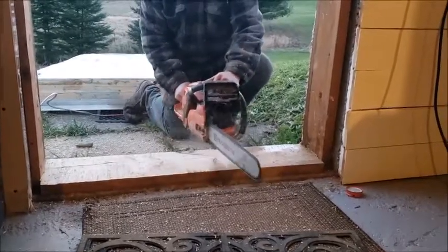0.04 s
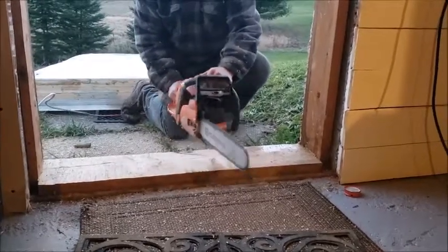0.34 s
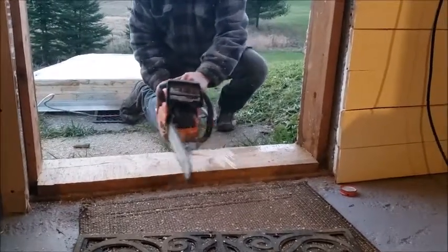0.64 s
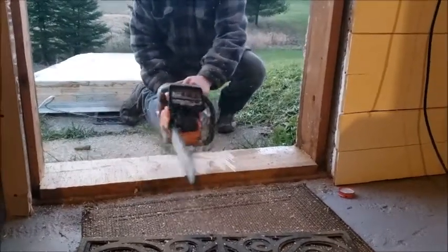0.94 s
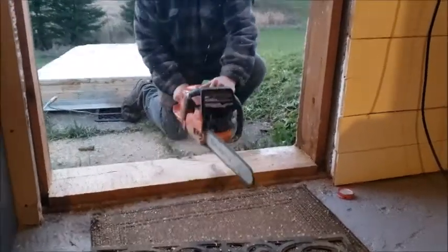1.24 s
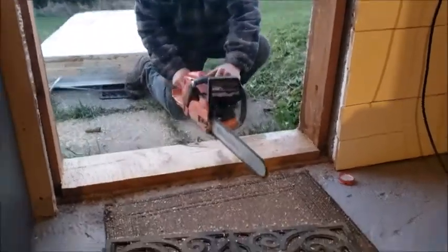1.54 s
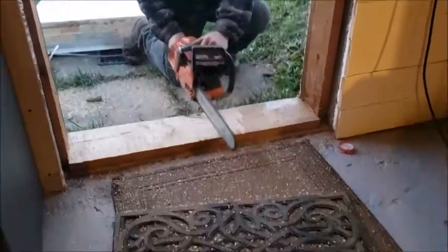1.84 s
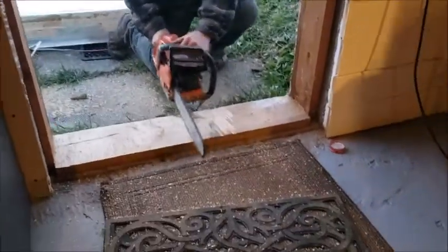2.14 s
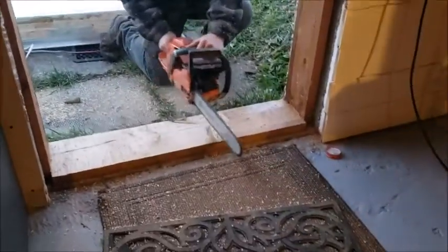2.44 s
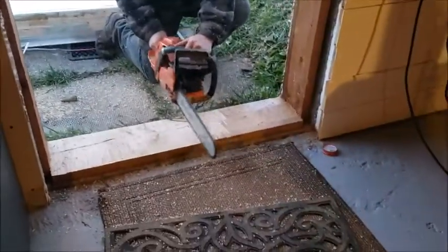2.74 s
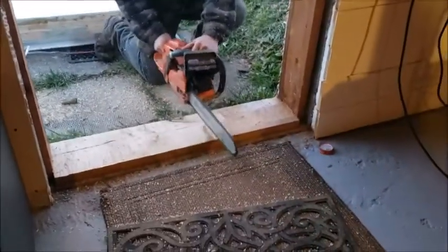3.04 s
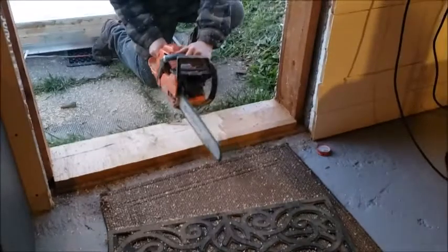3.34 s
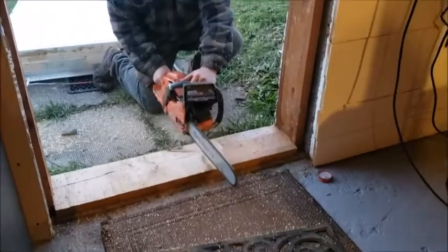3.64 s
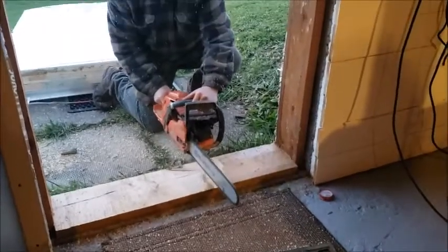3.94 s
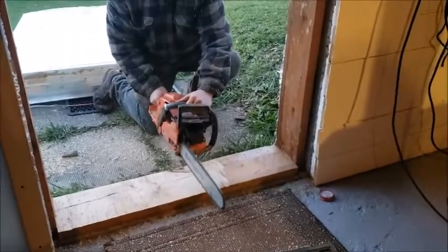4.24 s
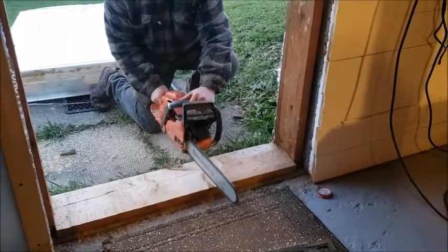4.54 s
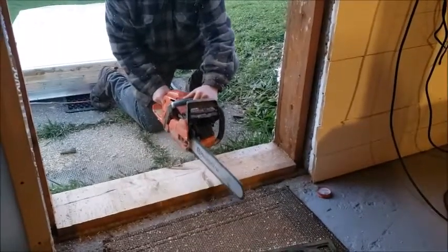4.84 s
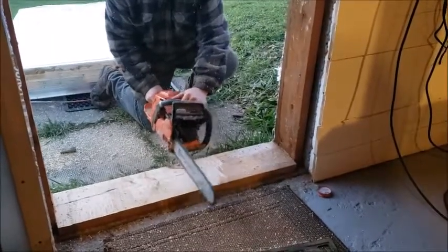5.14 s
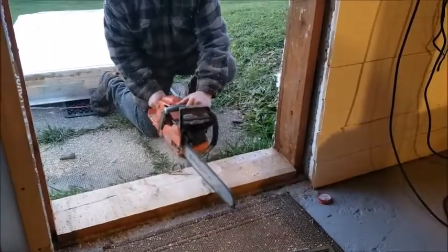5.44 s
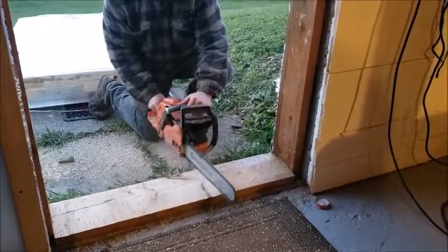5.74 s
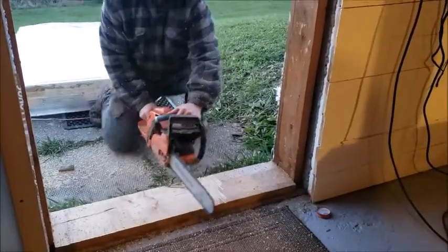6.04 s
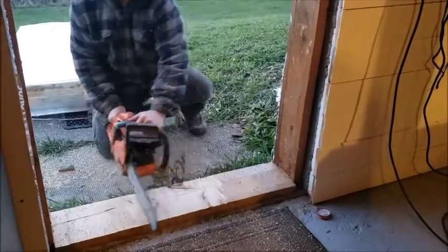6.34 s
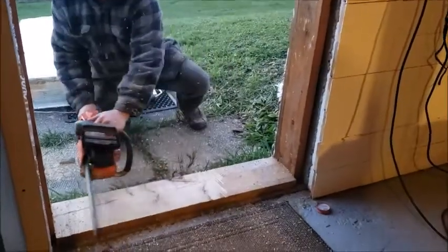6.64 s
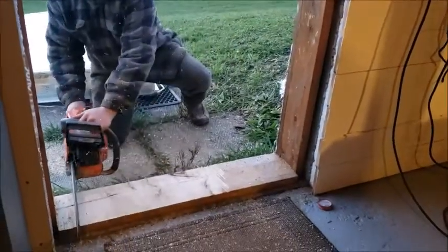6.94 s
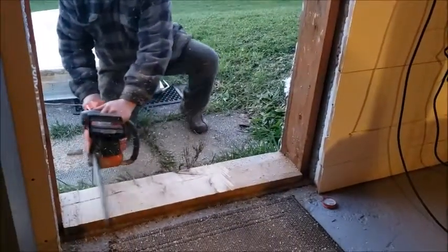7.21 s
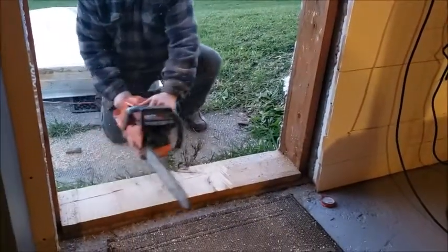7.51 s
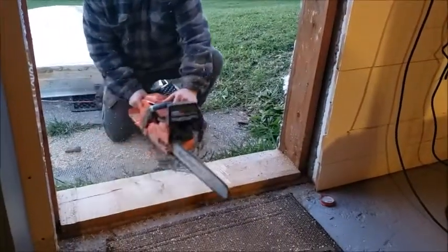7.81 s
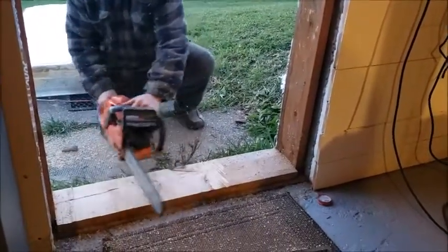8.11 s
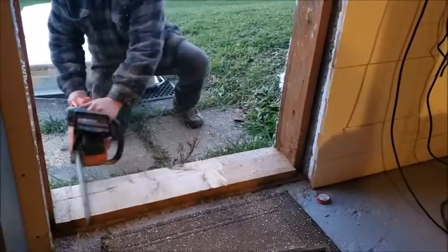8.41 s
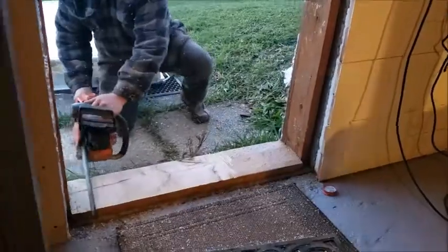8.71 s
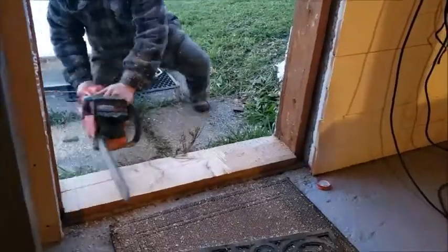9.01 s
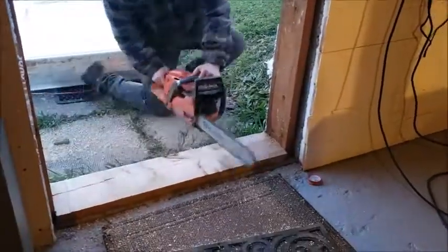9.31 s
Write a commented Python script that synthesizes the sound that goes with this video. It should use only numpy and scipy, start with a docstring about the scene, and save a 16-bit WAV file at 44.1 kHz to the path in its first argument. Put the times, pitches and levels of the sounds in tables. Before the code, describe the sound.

A two-stroke chainsaw buzzes at high revs while trimming wood, sagging briefly with each bite over a rasping chain.

```python
"""A two-stroke chainsaw, already at full throttle, trims a wooden door sill; a stereo microphone
stands just inside the doorway. Running light, the engine fires only every third or fourth turn; when
the chain bites, the speed sags and it fires every turn. Over the exhaust lie the whine of the flywheel
fan, the ring of the bar and the rasp of the chain. After nearly nine seconds the sound stops dead."""
import sys
import numpy as np
from scipy import signal
from scipy.fft import rfft, irfft, next_fast_len
from scipy.io import wavfile
from scipy.ndimage import uniform_filter1d

SR = 44100
rng = np.random.default_rng(int(sys.argv[2]) if len(sys.argv) > 2 else 0)


def unload_wav(signal):
    """Save mono or channel-first audio to the path in sys.argv[1] as 16-bit WAV at rate SR, clipped to [-1, 1]."""
    wavfile.write(
        sys.argv[1],
        SR,
        np.round(np.clip(np.atleast_2d(signal).T, -1, 1) * 32767).astype(np.int16),
    )


N = 422018
TIME = np.arange(N) / SR
CRUISE_HZ, TREBLE_EDGE_HZ = 200, 15780

# crankshaft speed, sagging each time the chain bites: (time [s], speed [turns/s])
CRANK_SPEED = [(0.0, 199.8), (0.23, 183.6), (0.36, 199.1), (0.77, 197.5), (0.86, 200.2), (0.95, 194.3),
               (1.1, 193.0), (1.25, 199.3), (1.45, 194.5), (1.52, 183.2), (1.61, 183.3), (1.68, 199.5),
               (1.8, 200.1), (1.9, 186.2), (2.24, 205.2), (2.58, 202.1), (2.7, 195.4), (3.03, 203.7),
               (3.41, 197.2), (3.47, 201.3), (3.74, 202.0), (3.89, 192.5), (4.15, 203.3), (4.34, 197.8),
               (4.6, 200.5), (4.75, 197.3), (4.91, 205.1), (5.22, 197.3), (5.51, 199.4), (5.64, 186.8),
               (5.87, 204.1), (5.96, 201.2), (6.1, 184.6), (6.26, 207.2), (6.42, 211.2), (6.77, 202.8),
               (6.99, 188.6), (7.19, 204.1), (7.51, 209.7), (7.63, 204.1), (7.75, 207.7), (7.88, 197.1),
               (8.21, 201.4), (8.34, 208.4), (8.54, 204.7), (8.65, 198.1)]
# burble of the bangs and the second harmonic: (time [s], relative level [dB])
BURBLE_LEVEL = [(0, 2), (1.4, 1.5), (2.4, -0.5), (3.4, -1.5), (5.2, -1.5), (5.7, -3.5), (6.5, -1.5),
                (8, -3), (8.64, -1.5)]


def gain_of(db):
    """Decibels to amplitude."""
    return 10 ** (np.asarray(db) / 20)


def unit_rms(x):
    """Scales to rms 1."""
    return x / np.sqrt(np.mean(x ** 2) + 1e-20)


def curve(rows):
    """A timed table's value at every sample."""
    return np.interp(TIME, *np.transpose(rows))


def value_at(spectrum, hz, column=1):
    """One column of a spectrum, interpolated on a log-frequency axis."""
    columns = np.transpose(spectrum)
    return np.interp(np.log(hz + 1), np.log(columns[0] + 1), columns[column])


def wander(rate_hz, channels=1, size=16384):
    """Slow random motion of rms 1."""
    hz = np.fft.rfftfreq(size, N / SR / size)
    white = rfft(rng.standard_normal((channels, size)))
    coarse = unit_rms(irfft(white / (1 + (hz / rate_hz) ** 2)))
    return np.array([np.interp(TIME, np.linspace(0, N / SR, size), row) for row in coarse])


def colour(x, spectrum, column=1, size=4096):
    """Minimum-phase filter with the given spectrum."""
    hz = abs(np.fft.fftfreq(size, 1 / SR))
    log_gain = np.log(gain_of(value_at(spectrum, hz, column)))
    response = np.fft.ifft(np.exp(np.conj(signal.hilbert(log_gain)))).real
    return signal.oaconvolve(x, response)[:N]


def pulses(at, height):
    """Impulses at fractional sample positions."""
    whole, part = np.divmod(np.clip(at, 0, N - 2), 1)
    whole = whole.astype(int)
    return np.bincount(whole, height * (1 - part), N) + np.bincount(whole + 1, height * part, N)


def decay(x, tail_s):
    """Gives each impulse an exponential tail."""
    return signal.lfilter([1], [1, -np.exp(-1 / (tail_s * SR))], x)


def tone(cycles, rough=0, rough_hz=1):
    """A sine of rms 1; roughness makes its height and phase waver, differently left and right."""
    shake = rough * (wander(rough_hz, channels=2) + 1j * wander(rough_hz, channels=2)) if rough else 0
    return unit_rms(((1 + shake) * np.exp(2j * np.pi * cycles)).imag)


def firings(openings, light_turns=3, stumble_chance=.01, back_to_back_db=-4.5):
    """Burn strength on each turn: the cylinder needs some turns to clear, now and then one more."""
    # spells away from the usual firing rhythm: (start [s], length [s], firing interval [turns])
    spells = [(.44, .29, 4), (1.46, .24, 1), (1.87, .32, 1), (3.52, .2, 4), (4.85, .19, 4), (5.58, .16, 1),
              (5.9, .18, 4), (6.08, .18, 1), (6.66, .26, 4), (6.92, .16, 1), (7.73, .19, 4), (7.92, .13, 1)]
    interval = np.full(len(openings), light_turns)
    for start, length, turns in spells:
        interval[(openings >= start * SR) & (openings < (start + length) * SR)] = round(turns)
    late = rng.random(len(openings)) < stumble_chance
    strength, waited = np.zeros(len(openings)), 0
    for turn in range(len(openings)):
        waited += 1
        if waited >= interval[turn] + late[turn]:
            strength[turn] = gain_of(back_to_back_db if waited == 1 else 0)
            waited = 0
    return strength


def exhaust(turns, openings, burns, buzz_db=-40, bang_db=-36, uneven_db=0.9, throb_db=0.9):
    """The port puffs every turn and the muffler hums, both louder under load; each burn adds a bang."""
    # one puff of the exhaust port: (frequency [Hz], relative level [dB])
    puff_spectrum = [(750, -29.5), (980, 11.5), (1200, 3), (1400, 3.5), (1600, 0.5), (1800, 5), (2000, 0.5),
                     (2200, -20), (2800, -10.5), (3400, -12), (4400, -5), (6000, -33)]
    # the bang of one burn: (frequency [Hz], relative level [dB])
    bang_spectrum = [(38, -23.5), (68, 5), (100, 2), (130, -2.5), (200, -6), (270, 5.5), (335, 1.5),
                     (400, -1), (480, 7), (660, -10), (1050, 0), (1400, -8), (1900, -19), (6000, -25)]
    # muffler hum at cruising speed, weakest with the saw swung aside: (time [s], relative level [dB])
    hum_level = [(0.0, -33), (1.32, -35), (2.16, -32), (2.28, -35.7), (2.52, -31), (3.96, -29),
                 (6.12, -29.5), (6.48, -26.5), (6.6, -34.5), (7.08, -33), (7.32, -36.2), (7.56, -30.5),
                 (8.04, -27.5), (8.52, -37.5), (8.64, -34)]
    puff_size, bang_size = gain_of(uneven_db * rng.standard_normal((len(openings), 2)).T)
    sag_hz = CRUISE_HZ - curve(CRANK_SPEED)
    buzz = unit_rms(colour(pulses(openings, puff_size), puff_spectrum))
    buzz *= gain_of(buzz_db + 0.15 * sag_hz)
    bangs = unit_rms(colour(pulses(openings, burns * bang_size), bang_spectrum))
    bangs *= gain_of(bang_db + curve(BURBLE_LEVEL))
    hum_db = curve(hum_level)
    hum = tone(turns) * gain_of(hum_db + 1 + 0.29 * sag_hz + throb_db * wander(rate_hz=5))
    overtones = muffler_overtones(turns, swell_db=hum_db - np.median(hum_db))
    buzz = hallway(buzz, wet_db=-0.5, t60_s=.1, low_hz=494, swing_hz=.7)
    bangs = hallway(bangs, wet_db=-3, t60_s=.15, low_hz=299.4, swing_hz=.5)
    return hum + overtones + buzz + bangs


def muffler_overtones(turns, swell_db, level_db=-3.5, pickup_db=6, pickup_hz_per_s=140, fade_db=2.3):
    """Harmonics 2-4 glide through the muffler, growl out of a bite and fade in and out as the saw moves."""
    # response of the muffler: (frequency [Hz], relative level [dB])
    muffler = [(365, -38.5), (400, -43.5), (425, -41), (550, -45), (590, -38.5), (635, -37.5), (735, -45),
               (785, -36.5), (845, -43)]
    # tilt towards the fourth harmonic and away from the third: (time [s], tilt [dB])
    growl = [(0, -2.5), (.2, 23), (.45, -2), (.8, -8), (1.05, 6.5), (1.35, 12), (1.65, -11), (2.5, 2),
             (3.0, -2), (3.9, 1), (5.9, 0), (6.19, 9), (6.29, -8), (6.95, 5), (7.72, -9), (7.86, 7),
             (8.08, 6), (8.35, -8.5), (8.64, 3)]
    speed, growl_db = curve(CRANK_SPEED), curve(growl)
    acceleration = uniform_filter1d(np.gradient(speed) * SR, size=3000)
    torque = np.clip(acceleration / pickup_hz_per_s, 0, 1)
    drive_db = 0.67 * swell_db + pickup_db * torque ** 2
    trends_db = [1.5 + 1.1 * curve(BURBLE_LEVEL), drive_db - growl_db / 2, drive_db + growl_db / 2]
    out = 0
    for harmonic, trend_db in enumerate(trends_db, 2):
        partial = tone(harmonic * turns, rough=0.25, rough_hz=22)
        muffler_db = value_at(muffler, harmonic * speed)
        out += partial * gain_of(level_db + muffler_db + trend_db + fade_db * wander(rate_hz=5))
    return out


def hallway(x, wet_db, t60_s, low_hz, swing_hz, echoes_per_s=2000, size=8192):
    """Walls and door throw back the mids and treble; the echoes shift as the saw is swung about."""
    t = np.arange(size) / SR
    shape = (2, 2, size)  # two echo patterns, each left and right
    taps = rng.standard_normal(shape) * (rng.random(shape) < echoes_per_s / SR)
    taps *= gain_of(-60 * t / t60_s) * (t > .002)
    taps /= np.linalg.norm(taps, axis=2, keepdims=True)
    taps = signal.lfilter(*signal.butter(2, low_hz, "high", fs=SR), taps)
    first, second = signal.oaconvolve(x[None, None], taps, axes=2)[..., :N]
    swing = 2 * wander(swing_hz)
    return x + gain_of(wet_db) * (np.cos(swing) * first + np.sin(swing) * second)


def fan(turns, blades=20, level_db=-3.5, fray_db=-10, spurt_db=2, slowing_db_per_hz=0.33):
    """Flywheel blades whine past the housing; turbulence breaks the tone into spurts and frays it."""
    # whine of the fan: (time [s], relative level [dB])
    whine_level = [(0, -33), (.25, -33.5), (.45, -31), (1.35, -30.5), (1.7, -32.5), (2.25, -30), (2.6, -33),
                   (3.3, -32.5), (3.7, -40), (4.1, -32), (4.6, -40), (4.95, -33), (5.4, -33), (6.35, -33),
                   (6.75, -31), (7.65, -32), (8.0, -33), (8.64, -28)]
    sway_cycles = 0.26 * wander(0.63, channels=2)  # the saw sways: left and right get their own phase
    whine = tone(blades * turns + sway_cycles, rough=0.53, rough_hz=38)
    fray = tone(blades * turns, rough=1.3, rough_hz=170) * gain_of(fray_db)
    spurts = gain_of(spurt_db * wander(rate_hz=9))
    slowing_db = slowing_db_per_hz * np.minimum(curve(CRANK_SPEED) - CRUISE_HZ, 0)
    return unit_rms((whine + fray) * spurts) * gain_of(curve(whine_level) + slowing_db + level_db)


def sprocket(turns, teeth=6):
    """Drive links strike the teeth; the bar rings when an overtone of that rate meets a resonance."""
    # resonances of the guide bar: (frequency [Hz], width [Hz], relative level [dB])
    bar_modes = [(2405, 27, -4), (3610, 540, -6)]
    # rattle of the chain on its sprocket: (time [s], level [dB])
    rattle_level = [(0, -54), (.8, -37), (1.5, -54), (2.2, -45), (2.85, -39), (3.2, -46), (4.7, -44.5),
                    (5.2, -37.5), (5.6, -45.5), (6, -40.5), (6.6, -44.5), (7.9, -43), (8.6, -45)]
    mesh_hz, ring = teeth * curve(CRANK_SPEED), 0
    for harmonic, (hz, width_hz, db) in enumerate(bar_modes, 2):
        response = gain_of(db) / np.hypot(1, 2 * (harmonic * mesh_hz - hz) / width_hz)
        ring += response * tone(harmonic * teeth * turns, rough=0.83, rough_hz=22)
    return unit_rms(ring) * gain_of(curve(rattle_level))


def chain(openings, burns, level_db=-26, surge=0.29, chips_per_s=700, chip_db=-8, spread_db=3):
    """Teeth tear chips from the wood amid a hiss of links and gas that surges with every burn."""
    # rasp of the chain: (frequency [Hz], relative level [dB])
    rasp_spectrum = [(20, -15.5), (60, -3.5), (150, 1), (400, -3), (800, 3), (1400, -2.5), (2000, 0),
                     (2600, 3), (3700, -1), (5000, 0.5), (16000, -3)]
    # likeness of the rasp on the microphone's two sides: (frequency [Hz], correlation [0-1])
    stereo_likeness = [(60, 0.88), (300, 0.4), (640, 0.32), (1400, 0.1), (3000, 0.02)]
    blast = 1 + surge * decay(pulses(openings, burns), tail_s=0.0052)
    blast /= uniform_filter1d(blast, size=2600)  # the burns only bunch the flow; its mean stays level
    chip_starts = rng.random(N) < chips_per_s / SR
    chips = chip_starts * gain_of(spread_db * np.minimum(rng.exponential(1, N), 4))
    tearing = gain_of(chip_db) * unit_rms(decay(chips, tail_s=0.0013))
    size = next_fast_len(N)
    hz = np.fft.rfftfreq(size, 1 / SR)
    left, unrelated = rfft(rng.standard_normal((2, N)) * np.hypot(blast, tearing), size)
    likeness = value_at(stereo_likeness, hz)
    right = likeness * left + np.sqrt(1 - likeness ** 2) * unrelated
    rasp = irfft(np.array([left, right]) * gain_of(value_at(rasp_spectrum, hz)), size)[:, :N]
    return kerf_colour(unit_rms(rasp)) * gain_of(level_db)


def kerf_colour(rasp, shift_db=1.48, shift_hz=2, bands=7):
    """The treble of the cut shifts in colour as the bar moves in the kerf."""
    edges_hz = np.linspace(2000, TREBLE_EDGE_HZ, bands + 1)
    change = 0
    for band_hz in zip(edges_hz, edges_hz[1:]):
        band = signal.lfilter(*signal.butter(1, band_hz, "band", fs=SR), rasp)
        change += band * (gain_of(shift_db * wander(shift_hz, channels=2)) - 1)
    return rasp + change


def chain_scrapes(width_hz=700, level_db=-2):
    """Now and then the chain scrapes with a high, narrow hiss that swells and fades."""
    # metallic scrapes: (peak time [s], half-length [s], frequency [Hz], relative level [dB])
    scrapes = [(1.35, .35, 9800, -40), (2.17, .5, 12200, -41), (6.8, .4, 9900, -42), (7.2, .2, 9900, -32),
               (8.45, .4, 9900, -41.5)]
    out = 0
    for peak_s, half_s, hz, db in scrapes:
        band = signal.butter(2, [hz - width_hz / 2, hz + width_hz / 2], "band", fs=SR)
        hiss = unit_rms(signal.lfilter(*band, rng.standard_normal((2, N))))
        swell = np.cos(np.pi / 2 * np.clip((TIME - peak_s) / half_s, -1, 1)) ** 2
        out += hiss * swell * gain_of(db + level_db)
    return out


def scene():
    """The saw at the sill: one crankshaft drives exhaust, fan and chain."""
    speed = curve(CRANK_SPEED) * (1 + 0.001007 * wander(rate_hz=9.9)[0])
    turns = np.cumsum(speed) / SR
    # sample positions at which the exhaust port opens, once a turn
    openings = np.interp(np.arange(1, int(turns[-1])), turns, np.arange(N))
    burns = firings(openings)
    engine = exhaust(turns, openings, burns) + fan(turns)
    return engine + sprocket(turns) + chain(openings, burns) + chain_scrapes()


def record(dry, right_lag_samples=4, stop_s=8.664):
    """The doorway microphone hears the saw later on the right and colours the treble; it stops dead."""
    # treble colour of the two microphone ports: (frequency [Hz], left gain [dB], right gain [dB])
    mic_colour = [(1490, 0, -0.5), (2727, 0.5, -1), (4374, 5, 3), (5030, -1, -3.5), (6060, 2.5, -3.5),
                  (7130, 4.5, 1.5), (7560, 5, -11.5), (9000, -5.5, -1.5), (9440, -6, 2), (11200, 2, -4),
                  (11980, -1.5, 8), (13460, 3, -4), (16200, -5, 8)]
    left = colour(dry[0], mic_colour, column=1)
    right = colour(np.pad(dry[1], (right_lag_samples, 0)), mic_colour, column=2)
    heard = np.array([left, right]) * np.clip((stop_s - TIME) / .002, 0, 1)
    lowpass = signal.firwin(1023, TREBLE_EDGE_HZ, window=("kaiser", 9), fs=SR)
    return signal.oaconvolve(heard, lowpass[None], "same")


dry = scene()
out = record(dry)
unload_wav(out)
```